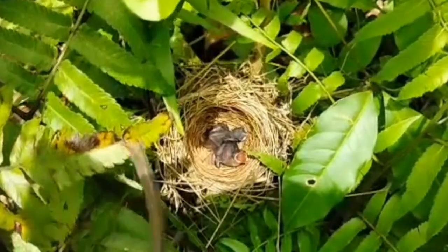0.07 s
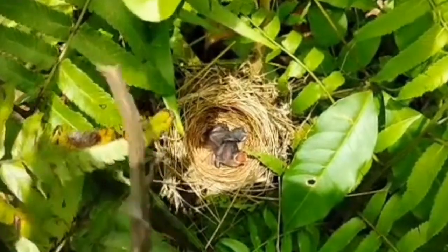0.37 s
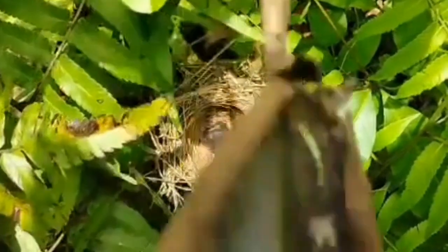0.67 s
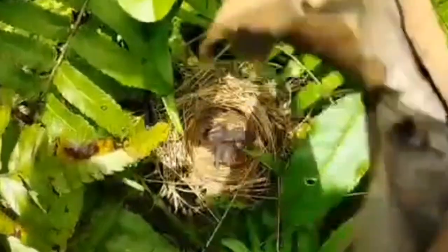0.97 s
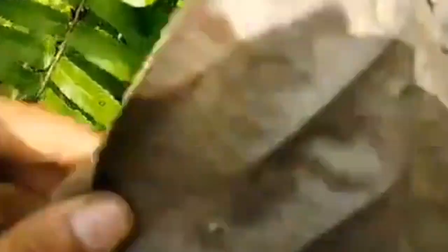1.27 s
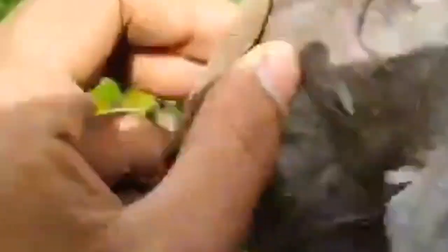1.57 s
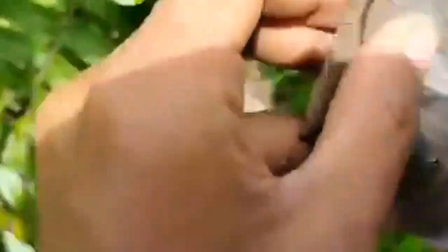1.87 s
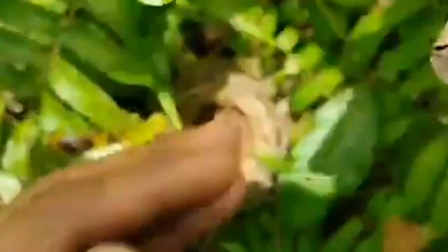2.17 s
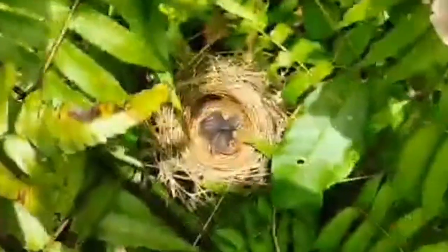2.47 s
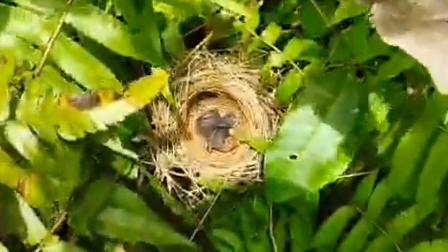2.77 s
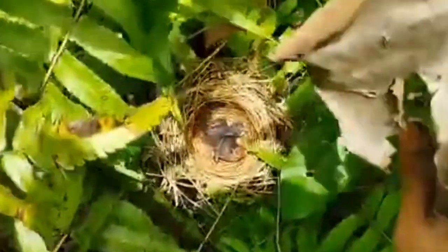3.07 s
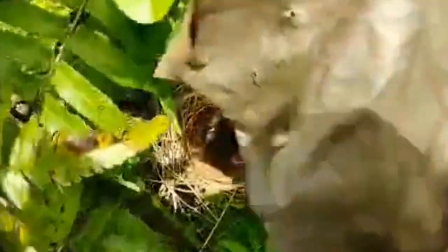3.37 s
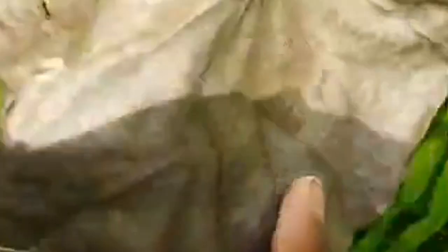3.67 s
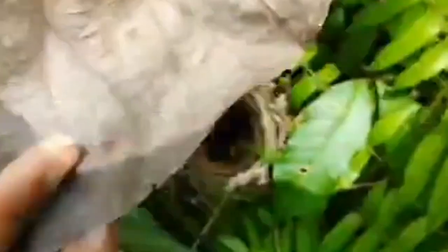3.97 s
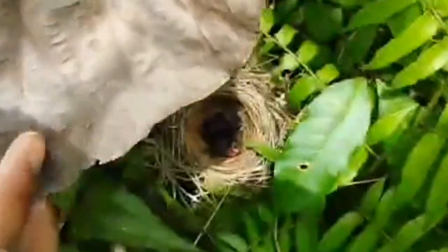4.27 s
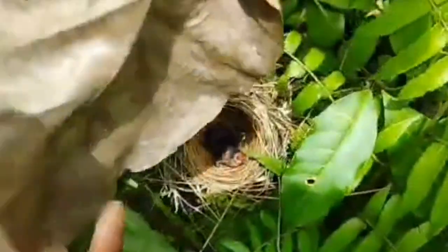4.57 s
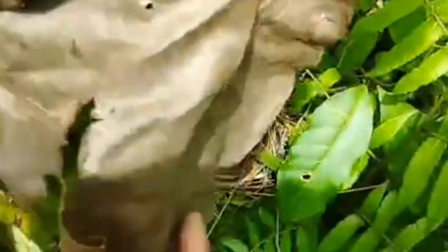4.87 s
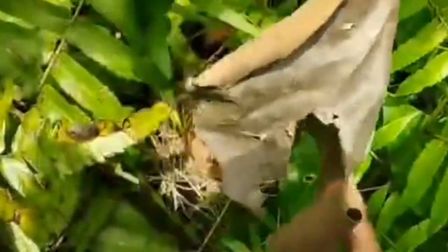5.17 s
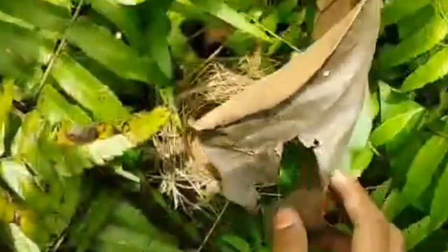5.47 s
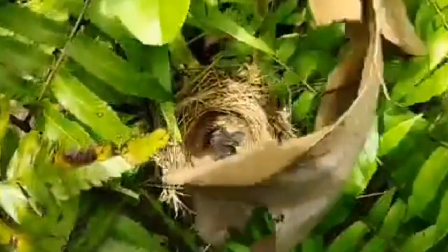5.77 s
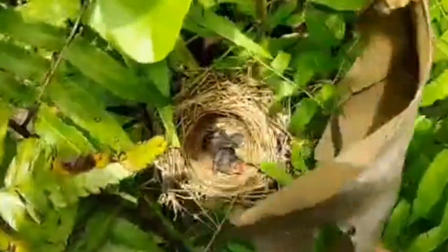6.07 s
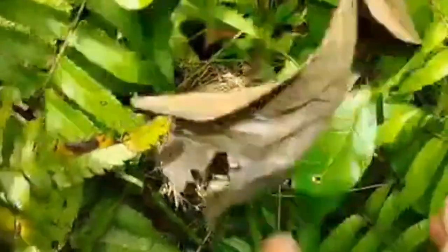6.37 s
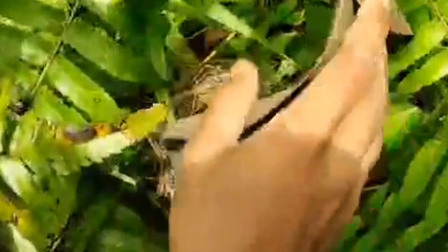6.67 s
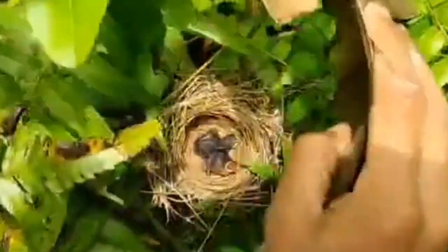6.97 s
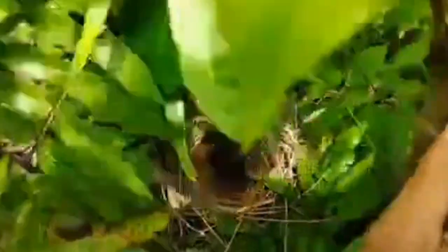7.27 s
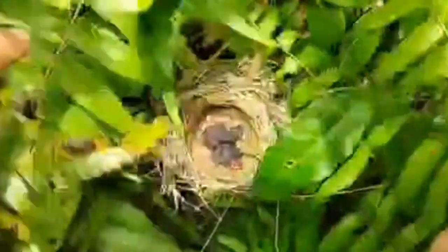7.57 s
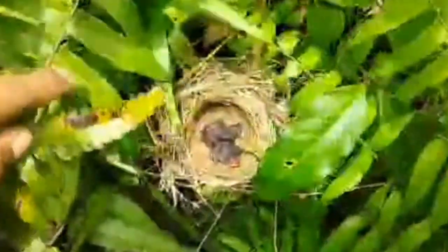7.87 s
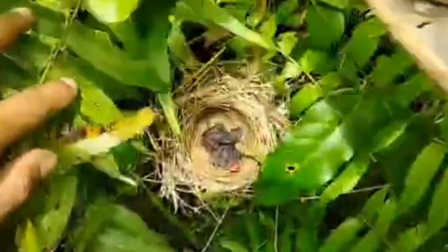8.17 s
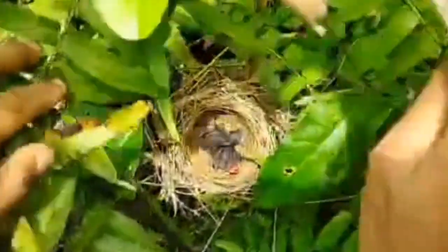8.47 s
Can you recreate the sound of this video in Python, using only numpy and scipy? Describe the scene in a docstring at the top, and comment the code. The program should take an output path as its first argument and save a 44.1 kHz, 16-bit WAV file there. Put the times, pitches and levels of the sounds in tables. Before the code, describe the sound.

Close rustling and crunching of a dry leaf as a hand crumples it and pushes it through plants, with faint high chirps.

```python
"""A hand moves a large dry leaf through ferns outdoors, close to the microphone, over quiet air.
In the first second the rubbing starts, a stream of tiny cracks, and three thin calls sound, probably
from small birds. From about 1.4 to 2 s the hand grips and crumples the leaf: veins snap, folds crunch.
One faint, lower call follows near 2.7 s. Until the end at 8.5 s the leaf is pushed on in gentler
strokes: it rustles, scrapes over stems, snaps now and then and bumps softly against the plants."""
import sys
import numpy as np
from scipy import signal
from scipy.fft import rfft, irfft
from scipy.io import wavfile

SR = 44100
rng = np.random.default_rng(int(sys.argv[2]) if len(sys.argv) > 2 else 0)


def store_pcm(level_fs):
    """Save levels as 16-bit WAV."""
    pcm = np.round(np.clip(level_fs, -1, 1) * 32767).astype(np.int16)
    wavfile.write(sys.argv[1], SR, np.atleast_2d(pcm).T)


N = 376173
TIME = np.arange(N) / SR

# The leaf has three ranges: flex (low, its bending blade), crackle (middle, its edges), fizz (high).
FLEX_FROM_HZ, CRACKLE_FROM_HZ, FIZZ_FROM_HZ, FIZZ_TO_HZ = 400, 2200, 5930, 17200
# Levels in the tables are relative: the functions shift them up or down.
# Light, steady touch of the leaf on the ferns: time_s, crackle_db, flex_db
LIGHT_TOUCH = [(0, -63, -60.5), (0.4, -82, -66), (0.75, -63, -54.5), (1.38, -53, -54), (1.85, -57, -49),
               (2.1, -52, -54.5), (2.55, -61, -61), (2.94, -61, -64), (3.4, -49.5, -51.5),
               (4.07, -59.5, -61), (4.4, -54, -57.5), (4.97, -51, -51.5), (5.3, -55, -62.5),
               (5.7, -53.5, -56), (6.6, -60, -62), (7.35, -50, -55), (8.2, -59, -59), (8.53, -57.5, -56)]
# The hand pushes the leaf along: start_s, length_s, crackle_db, flex_above_crackle_db
HAND_PUSHES = [(0.581, 0.18, -52, -1), (0.878, 0.038, -54.5, 1), (0.968, 0.11, -53.5, 10),
               (1.05, 0.058, -44.5, 3.5), (1.124, 0.066, -43.5, 0.5), (1.223, 0.082, -45, 1.5),
               (1.439, 0.11, -40.5, -2.5), (1.525, 0.13, -41.5, -2), (1.691, 0.028, -45, 2),
               (1.756, 0.024, -35, -1.5), (1.811, .035, -33.5, -6), (1.87, 0.068, -31, -7.5),
               (1.94, 0.07, -34, -5), (2.125, 0.05, -54, -2.5), (2.263, 0.13, -48.5, -6),
               (2.99, 0.097, -54, -3.5), (3.156, 0.19, -51.5, -3.5), (3.375, .11, -54.5, 0),
               (3.526, 0.14, -52, 4), (3.704, 0.031, -50, 2.5), (3.77, 0.15, -47, 0.5),
               (3.92, 0.065, -54.5, 1), (4.123, 0.27, -57.5, 6), (4.395, 0.095, -48.5, 0),
               (4.481, 0.041, -47.5, -0.5), (4.599, 0.045, -53, 2), (4.767, 0.13, -51.5, 3.5),
               (5.053, 0.11, -53, -4), (5.317, 0.27, -57, -2.5), (5.565, .14, -45, -4),
               (5.886, 0.071, -46.5, -6.5), (6.158, 0.12, -51, -9), (6.295, 0.066, -51, -3),
               (6.707, 0.14, -44, -2), (6.965, 0.16, -50.5, 0), (7.155, 0.17, -48, -7),
               (7.333, 0.067, -42, -1), (7.417, 0.059, -64, 4), (7.603, 0.015, -45, 3),
               (7.648, 0.15, -47.5, 0.5), (7.872, 0.16, -53, -0.5), (8.315, 0.046, -45.5, 0.5)]
# Veins snap: start_s, level_db, pitch_hz, flex_db, fizz_db, decay_s
VEIN_SNAPS = [(0.669, -15.5, 3700, -3.5, -29, 0.0015), (1.212, -29, 920, -10, -9, 0.0027),
              (1.406, -24, 1130, -9, -14, .0037), (1.437, -23.5, 1140, -12, -19, 0.0055),
              (1.473, -20, 3900, -9, -13, 0.0024), (1.481, -27, 1230, -16, -14, .0019),
              (1.53, -4, 3990, -10, -14, 0.0028), (1.542, -4.5, 4500, -22, -22, 0.0015),
              (1.569, -11.5, 3840, -8.5, -12.5, 0.0037), (1.754, -14, 3470, -10, -12, .0015),
              (1.767, -9.5, 3570, -6.5, -4, 0.0032), (1.811, -10.5, 4000, -7, -8, 0.0018),
              (1.856, -14.5, 3900, -7, -23, .0015), (1.879, -5.5, 2500, -9.5, -15, 0.0013),
              (1.884, -7.5, 4050, -8, -17, 0.003), (1.895, -9, 1500, -17, -31, 0.0026),
              (1.914, -8, 1830, -24, -23, 0.0025), (1.932, -12.5, 4300, -27, -15, 0.0039),
              (1.987, -5, 5300, -11, -19, 0.00096), (2.152, -27, 3300, -16, -10, .0018),
              (2.213, -27.5, 2200, -13, -16, 0.01), (2.289, -21, 1570, -8.5, -22, 0.002),
              (2.342, -24.5, 2190, -32, -36, 0.0014), (2.804, -33.5, 4130, -27, -9.5, 0.0048),
              (3.312, -25, 3070, -6, -7, 0.0034), (3.513, -20.5, 920, -11, -21, 0.0022),
              (3.631, -26, 940, -16, -15, 0.004), (3.827, -20.5, 1170, -21, -3.5, 0.0019),
              (4.803, -23, 4040, -13, -16, 0.003), (4.902, -25.5, 4000, -22, -17, .004),
              (5.217, -20.5, 3060, -11, -8, 0.0071), (5.592, -20, 3020, -19, -17, 0.0026),
              (5.627, -24, 3930, -27, -30, .0021), (6.163, -17, 3650, -14.5, -5, .0026),
              (6.692, -19.5, 1790, -35, -22, 0.0014), (6.847, -24, 1490, -9, -9.5, 0.0074),
              (6.966, -9, 3240, -11, 0.5, .0019), (7.333, -25, 4100, -6, -7, 0.0028),
              (7.354, -20.5, 4020, -5, -9, 0.0024), (7.371, -17, 3700, -6, -10, 0.0022),
              (7.448, -23.5, 4300, -23, -16.5, .0015), (7.6, -25, 2340, -20, -39, 0.002),
              (7.616, -19.5, 1420, -21, -22, 0.00074)]
# Folds give way in a run of cracks: start_s, level_db, pitch_hz, flex_db, fizz_db, decay_s
FOLD_CRUNCHES = [(0.024, -31, 2540, -9, -17, 0.0029), (0.472, -35.5, 4150, -8, -11, 0.019),
                 (0.633, -25.5, 1700, -13, -15, 0.006), (0.657, -23, 3520, 1, -25, 0.0039),
                 (0.775, -30, 3420, -5, -10, 0.0055), (0.99, -24.5, 1510, -5, -24, 0.0037),
                 (1.074, -25, 940, -17, -25, 0.015), (1.259, -20.5, 1600, -19, -17, 0.0036),
                 (1.303, -16.5, 1000, -7.5, -19.5, 0.0025), (1.619, -13.5, 3860, -10, -13, 0.0049),
                 (1.669, -16, 3470, -7, -10.5, 0.0041), (1.782, -3.5, 3180, -17, -8.5, 0.0014),
                 (1.83, -10.5, 4080, -10, -17, 0.015), (1.913, 0.5, 1620, -13, -19, 0.0029),
                 (1.966, -15.5, 1570, -14, -11, 0.002), (3.275, -28.5, 3080, -6, -8, 0.017),
                 (3.455, -28, 1770, -5, -6, 0.0073), (3.556, -23.5, 920, -7, -13, 0.0028),
                 (3.609, -26, 1090, -9, -15, 0.0052), (4.111, -30.5, 1210, -7, -16, .0043),
                 (4.442, -25.5, 3460, -10, -5, .0028), (5.595, -16.5, 3020, -9, -18, 0.0027),
                 (5.66, -29, 2130, -10, -12, .008), (5.764, -28.5, 1930, -23, -17, .0034),
                 (6.095, -31, 3870, -12, -14, 0.0032), (6.158, -22, 3620, -4, -7, 0.0027),
                 (6.217, -29, 4440, -14.5, -18, .0035), (6.335, -28.5, 1440, -17, -27, 0.004),
                 (6.755, -21, 2180, -9, -15, 0.0045), (7.202, -20.5, 4020, -14, -16, 0.0043),
                 (7.367, -18, 3900, -7, -25, 0.0043), (7.735, -18, 1140, 6, -32, 0.0029),
                 (8.361, -24.5, 960, -12, -17, 0.0047), (8.428, -24.5, 1200, -17, -35, 0.002)]
# An edge drags over a stem: middle_s, half_length_s, pitch_hz, level_db
STEM_SCRAPES = [(1.066, 0.03, 970, -45.5), (3.202, 0.041, 930, -49.5), (4.197, 0.094, 980, -55.5),
                (4.514, 0.02, 950, -46.5), (4.873, 0.039, 920, -47.5), (4.89, 0.033, 4180, -46),
                (5.357, 0.0062, 2090, -51), (5.42, 0.091, 3360, -61), (5.653, 0.017, 2210, -43),
                (5.858, 0.012, 3350, -50), (5.925, 0.027, 3370, -49), (6.073, 0.028, 4420, -56),
                (7.072, 0.0095, 730, -46.5), (7.21, 0.028, 3900, -48), (7.31, 0.027, 4040, -56),
                (7.938, 0.092, 3220, -61), (8.436, 0.0059, 1110, -43.5)]
# Tone colour of the leaf's cracks as heard through the microphone, whose resonances add peaks
# near 4.3 and 8.4 kHz: frequency_hz, level_db
CRACK_COLOUR_AT_MIC = [(300, -4), (520, -2.5), (720, -1), (980, 1), (1250, 2.5), (1600, 0.5), (2550, -0.5),
                       (3300, 9), (4350, 5.5), (5400, -5), (6600, -8.5), (8400, -1.5), (10300, -17.5),
                       (13000, -16)]
# Pitches at which the curled leaf rings: pitch_hz, width_hz, level_db
LEAF_RINGS = [(642, 42, -7.5), (950, 83, -1.5), (1550, 210, -6), (2160, 140, -8.5), (3020, 160, -4.5),
              (3390, 91, -23), (4020, 260, -6.5), (4480, 180, -11), (8000, 100, -35)]
# The limp blade bumps into plants: start_s, level_db, pitch_hz, decay_s
BLADE_BUMPS = [(0.665, -40.5, 374, 0.016), (1.091, -38, 168, 0.013), (1.302, -32.5, 220, 0.014),
               (1.404, -32, 105, 0.0079), (1.533, -21, 95, 0.014), (1.636, -26, 328, 0.02),
               (1.789, -28, 160, 0.018), (1.882, -21, 380, 0.022), (2.188, -39.5, 424, 0.015),
               (2.441, -47, 386, 0.13), (3.098, -39, 186, 0.017), (3.269, -38.5, 303, 0.028),
               (3.516, -41, 225, .012), (3.6, -41, 140, 0.027), (4.12, -48, 254, 0.0086),
               (4.514, -47, 178, 0.019), (4.81, -55, 436, 0.017), (5.912, -51, 254, .016),
               (6.171, -45, 138, .022), (6.743, -47, 199, 0.02), (7.095, -42.5, 427, 0.015),
               (7.294, -44, 189, 0.023), (7.377, -32, 327, 0.024), (7.601, -47, 97, .02),
               (7.74, -36, 191, 0.016)]
# The nearer the blade, the more air it pushes at the microphone: time_s, flutter_above_flex_db
BLADE_NEARNESS = [(0, -18), (0.62, -24), (0.7, -4.5), (1.2, -12), (1.7, -1), (2.0, -3), (2.2, -17),
                  (3.0, -18), (3.55, -11), (3.95, -18), (5.0, -23.5), (5.65, -27), (6.8, -17), (7.6, -15.5),
                  (8.0, -18), (8.53, -15)]
# Tone colour of the swaying blade: frequency_hz, level_db
BLADE_COLOUR = [(18, -77), (30, -15), (48, -20), (92, 0), (171, 0.5), (204, 3), (243, -0.5), (325, -0.5),
                (600, -2), (780, -36), (1320, -120)]
# Thin calls: start_s, peak_s, fade_s, level_db, pitch_hz, glide_hz_per_s
BIRD_CALLS = [(-0.03, 0.056, 0.068, -51.5, 9450, -200), (0.538, 0.63, 0.16, -51.5, 9130, 1608),
              (0.805, 0.857, 0.13, -49.5, 9270, -200), (2.72, 2.765, 0.025, -59, 2910, -4500)]
# Tone colour of the still air: frequency_hz, level_db
AIR_COLOUR = [(18, -34), (30, -21), (43, -7), (110, 2.5), (295, -2.5), (443, 7), (950, 2.5), (1050, -38),
              (1580, -11), (2490, -1.5), (4250, 5), (6070, -10), (9340, -8.5), (10100, -9.5), (13000, -30)]


def rubbing(crackle_db, flex_db):
    """The leaf sticks and slips over the ferns, shedding clumps of fine cracks and a few coarse ones."""
    clumps_db = 2.0 * drift(49)
    fine = tiny_cracks(per_s=8000, spread_db=-0.5, width_at_1khz_hz=254, ring_db=1)
    coarse = tiny_cracks(per_s=150, spread_db=1, width_at_1khz_hz=220, ring_db=4)
    ranges = crack_ranges(curled_leaf(fine + from_db(-10) * coarse))
    levels_db = flex_db - 0.63, crackle_db - 0.96, crackle_db - 7.5
    out = np.zeros(N)
    for sound, level_db in zip(ranges, levels_db):
        flicker_db = clumps_db + 0.6 * drift(103)
        out += from_db(level_db) * rms_one(sound * from_db(flicker_db))
    return out


def tiny_cracks(per_s, spread_db, width_at_1khz_hz, ring_db, patches=24):
    """Each tiny crack comes at random: a click and a short ring of its own patch of leaf."""
    sizes = from_db(spread_db * np.minimum(rng.exponential(1, N), 4)) * rng.choice([-1, 1], N)
    clicks = sizes * (rng.random(N) < per_s / SR)
    patch = rng.integers(0, patches, N)
    pitches = np.geomspace(450, 12500, patches)
    widths = width_at_1khz_hz * pitches / 1000   # higher patches die away sooner
    rings = sum(resonate(clicks * (patch == k), pitches[k], widths[k]) * (-1) ** k
                for k in range(patches))
    return rms_one(clicks) + from_db(ring_db) * rms_one(rings)


def hand_pushes(attack_s=0.01, release_s=0.025):
    """Crackle and flex levels in dB: each push swells, holds and dies away on top of the light touch."""
    crackle_power, flex_power = [from_db(db) ** 2 for db in curves(LIGHT_TOUCH)]
    for start_s, length_s, crackle_db, flex_above_db in HAND_PUSHES:
        span = slice(int(start_s * SR), int(start_s * SR) + SR)
        t = TIME[span] - start_s
        swell = np.minimum(t / (attack_s + 0.14 * length_s), 1)   # a longer push swells for longer
        fade = np.exp(-np.maximum(t - length_s, 0) / release_s)
        push = from_db(crackle_db) * swell * fade
        crackle_power[span] += push ** 2
        flex_power[span] += (from_db(flex_above_db) * push) ** 2
    return 10 * np.log10(crackle_power), 10 * np.log10(flex_power)


def curled_leaf(sound, bends_per_s=6):
    """Each ringing pitch comes and goes as the leaf bends and the point of contact moves."""
    rings = np.zeros(N)
    for pitch_hz, width_hz, level_db in LEAF_RINGS:
        bend_db = 9.5 * np.clip(drift(bends_per_s), -2, 1)
        rings += from_db(level_db + bend_db) * resonate(sound, pitch_hz, width_hz)
    return sound + rings


def crack_ranges(cracks):
    """The leaf's cracks as heard through the microphone, split into flex, crackle and fizz."""
    sound = coloured(cracks, CRACK_COLOUR_AT_MIC)
    return (band(sound, FLEX_FROM_HZ, CRACKLE_FROM_HZ, order=3),
            band(sound, CRACKLE_FROM_HZ, FIZZ_FROM_HZ, order=4),
            band(sound, FIZZ_FROM_HZ, FIZZ_TO_HZ, order=4))


def big_cracks(rows, rise_s, gain_db, flex_gain_db, fizz_gain_db, ring_db, ring_width_hz, flex_slower):
    """A crack runs in a burst of slips; the patch beside it rings and the blade shakes a bit longer."""
    size = 4096
    out, t = np.zeros(N + size), np.arange(size) / SR
    decays_s = np.array(rows)[:, -1:]
    rise = (1 - np.exp(-t / rise_s)) ** 2
    sharp = rise * np.exp(-t / decays_s)
    slow = rise * np.exp(-t / (decays_s * flex_slower))
    slips = rng.choice([-1., 1.], sharp.shape)
    flexes = crack_ranges((slips * slow).ravel())[0].reshape(slips.shape)
    _, crackles, fizzes = [x.reshape(slips.shape) for x in crack_ranges((slips * sharp).ravel())]
    for k, (start_s, level_db, pitch_hz, flex_db, fizz_db, _) in enumerate(rows):
        ring = resonate(slips[k] * sharp[k], pitch_hz, ring_width_hz)
        ring = resonate(ring, pitch_hz, pitch_hz / 2)
        burst = (rms_one(crackles[k])
                 + from_db(flex_db + flex_gain_db) * rms_one(flexes[k])
                 + from_db(fizz_db + fizz_gain_db) * rms_one(fizzes[k])
                 + from_db(ring_db) * rms_one(ring))
        first = int(start_s * SR)
        out[first:first + size] += from_db(level_db + gain_db) * rms_one(burst) / rms_one(sharp[k]).max()
    return out[:N]


def small_snaps(crackle_db, per_s=3, low_hz=1110, high_hz=4500, flex_db=-9, fizz_db=-16, decay_s=0.0029):
    """Small veins snap by chance, louder when the rubbing is louder. Gives rows like VEIN_SNAPS."""
    when, pitch, strength = rng.random((int(per_s * N / SR), 3)).T
    at = (when * (N - 1)).astype(int)
    levels_db = crackle_db[at] + 12 + 3 * strength
    pitches_hz = low_hz * (high_hz / low_hz) ** pitch
    return [(s, db, hz, flex_db, fizz_db, decay_s) for s, db, hz in zip(TIME[at], levels_db, pitches_hz)]


def scraping(gain_db, width_hz, slips_per_s):
    """An edge drags over a stem: quick slips set one patch of leaf rasping, swelling and fading."""
    slips = rng.standard_normal(N) * (rng.random(N) < slips_per_s / SR)
    out = np.zeros(N)
    for middle_s, half_length_s, pitch_hz, level_db in STEM_SCRAPES:
        near = np.abs(TIME - middle_s) < 3 * half_length_s
        rasp = resonate(resonate(slips[near], pitch_hz, width_hz), pitch_hz, width_hz)
        swell = np.exp(-((TIME[near] - middle_s) / half_length_s) ** 2 / 2)
        out[near] += from_db(level_db + gain_db) * rms_one(rasp) * swell
    return out


def swaying_blade(flex_db, flutter_gain_db, bump_gain_db, ring_db, ring_width_hz, size=16384):
    """The broad blade flutters dully; where it meets a stem it thuds and rings briefly."""
    out, t = np.zeros(N + size), np.arange(size) / SR
    flutter = rms_one(coloured(rng.standard_normal(N), BLADE_COLOUR))
    out[:N] = from_db(flex_db + curves(BLADE_NEARNESS)[0] + flutter_gain_db) * flutter
    for start_s, level_db, pitch_hz, decay_s in BLADE_BUMPS:
        thud = coloured(rng.standard_normal(size) * np.exp(-t / decay_s), BLADE_COLOUR)
        ring = resonate(thud, pitch_hz, ring_width_hz)
        bump = rms_one(thud) + from_db(ring_db) * rms_one(ring)
        first = int(start_s * SR)
        out[first:first + size] += from_db(level_db + bump_gain_db) * bump / np.abs(bump).max()
    return out[:N]


def plant_echoes(sound, fade_60db_s, size=8192):
    """Nearby plants and the ground scatter the sound into a short, dull tail."""
    t = np.arange(size) / SR
    fade = from_db(-60 * t / fade_60db_s) * (t > 0.003)
    echoes = band(rng.standard_normal(size), 280, 9900, order=1) * fade
    return signal.oaconvolve(sound, echoes / np.sqrt(np.sum(echoes ** 2)))[:N]


def bird_calls(waver_hz, rasp_db, glide_s=0.2):
    """Each call is a hissy whistle that swells, glides and fades, with a rasp just below its start."""
    out = np.zeros(N)
    smoothing = signal.butter(4, waver_hz, fs=SR, output="sos")
    for start_s, peak_s, fade_s, level_db, pitch_hz, glide_hz_per_s in BIRD_CALLS:
        swell = np.clip((TIME - start_s) / (peak_s - start_s), 0, 1)
        fade = np.exp(-np.maximum(TIME - peak_s, 0) / fade_s)
        gliding_hz = pitch_hz + glide_hz_per_s * np.clip(TIME - start_s, 0, glide_s)
        phase = 2 * np.pi * np.cumsum(gliding_hz) / SR
        waver = signal.sosfilt(smoothing, rng.standard_normal((2, N)))
        whistle = rms_one(waver[0] * np.cos(phase) + waver[1] * np.sin(phase))
        rasp = rms_one(band(rng.standard_normal(N), 0.91 * pitch_hz, pitch_hz, order=3))
        out += from_db(level_db) * swell * fade * (whistle + from_db(rasp_db) * rasp)
    return out


def still_air(level_db):
    """The quiet outdoor air is a faint, steady hush."""
    return from_db(level_db) * rms_one(coloured(rng.standard_normal(N), AIR_COLOUR))


def from_db(db):
    """Turn decibels into a number to multiply by."""
    return 10 ** (np.asarray(db) / 20)


def rms_one(x):
    """Scale a signal so that its average strength (root mean square) is 1."""
    return x / np.sqrt(np.mean(x ** 2) + 1e-20)


def curves(rows):
    """Join a table's points in time with straight lines, one curve for each level column."""
    times_s, *columns = np.transpose(rows)
    return [np.interp(TIME, times_s, column) for column in columns]


def band(x, low_hz, high_hz, order):
    """Keep the sound between two frequencies; a higher order cuts more steeply."""
    return signal.sosfilt(signal.butter(order, [low_hz, high_hz], "band", fs=SR, output="sos"), x)


def resonate(x, pitch_hz, width_hz):
    """Make a sound ring at one pitch; a smaller width rings for longer."""
    r = np.exp(-np.pi * width_hz / SR)
    feedback = [1, -2 * r * np.cos(2 * np.pi * pitch_hz / SR), r * r]
    return signal.lfilter(np.array([1, 0, -1]) * (1 - r * r) / 2, feedback, x + 1e-18)


def coloured(x, colour, size=4096):
    """Give a sound the tone colour in a table."""
    hz, db = np.transpose(colour)
    grid_hz = np.arange(size // 2 + 1) * SR / size + 1
    log_gain = np.log(from_db(np.interp(np.log(grid_hz), np.log(hz), db)))
    # Keep one half, doubled, so that the filter rings only after a click (minimum phase).
    cepstrum = irfft(log_gain)[:size // 2]
    cepstrum[1:] *= 2
    click_response = irfft(np.exp(rfft(cepstrum, size)))
    return signal.oaconvolve(x, click_response)[:len(x)]


def drift(rate_hz, step=20, warm_up=2000):
    """A smooth random wobble, about 1 in size."""
    r = np.exp(-2 * np.pi * rate_hz * step / SR)
    noise = rng.standard_normal(N // step + warm_up + 2)
    slow = signal.lfilter([1], [1, -2 * r, r * r], noise)[warm_up:]
    return np.interp(np.arange(N) / step, np.arange(len(slow)), rms_one(slow))


def scene():
    """Add up the leaf, its echoes, its swaying blade, the birds and the air."""
    crackle_db, flex_db = hand_pushes()
    leaf = rubbing(crackle_db, flex_db)
    leaf += scraping(gain_db=-1.5, width_hz=290, slips_per_s=900)
    snaps = VEIN_SNAPS + small_snaps(crackle_db)
    leaf += big_cracks(snaps, rise_s=0.00024, gain_db=-8, flex_gain_db=8.5, fizz_gain_db=9.5,
                       ring_db=2, ring_width_hz=280, flex_slower=4.6)
    leaf += big_cracks(FOLD_CRUNCHES, rise_s=0.0033, gain_db=-13.5, flex_gain_db=10, fizz_gain_db=10,
                       ring_db=-0.5, ring_width_hz=76, flex_slower=2)
    air = still_air(level_db=-61.5)
    blade = swaying_blade(flex_db, flutter_gain_db=-1, bump_gain_db=-5, ring_db=-6.5, ring_width_hz=14)
    birds = bird_calls(waver_hz=260, rasp_db=-5.5)
    echoes = from_db(-17.5) * plant_echoes(leaf, fade_60db_s=0.086)
    return (leaf + echoes + blade + birds + air)[None]


def record(dry):
    """Cut the treble steeply above 13050 Hz."""
    return signal.sosfilt(signal.ellip(12, 0.2, 80, 13050, fs=SR, output="sos"), dry)


dry = scene()
out = record(dry)
store_pcm(out)
```